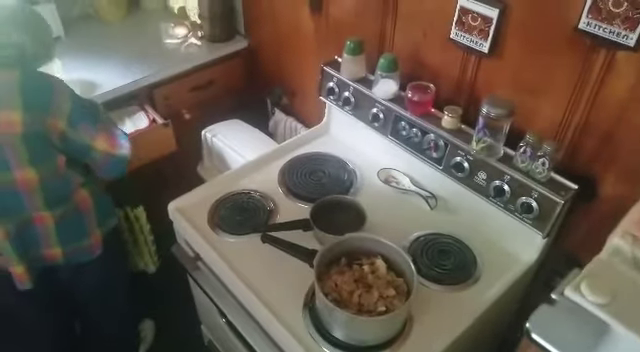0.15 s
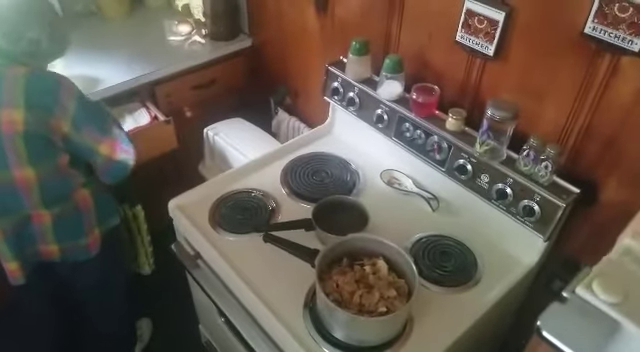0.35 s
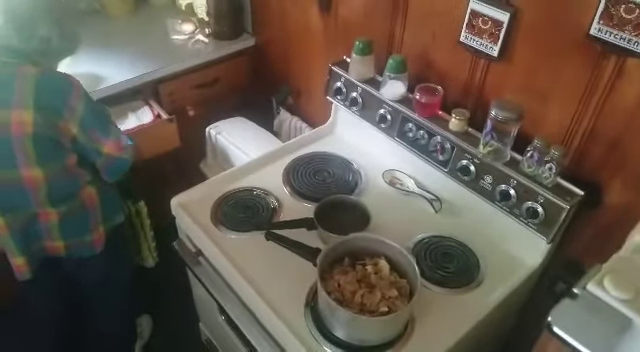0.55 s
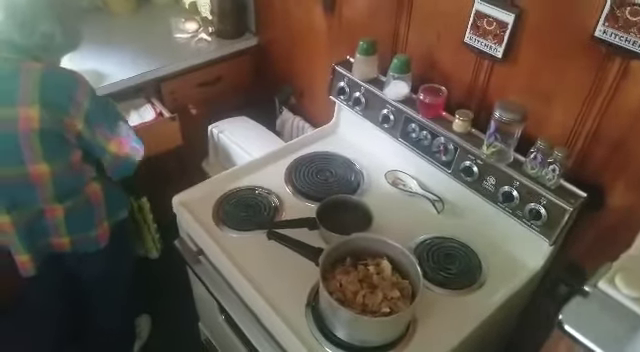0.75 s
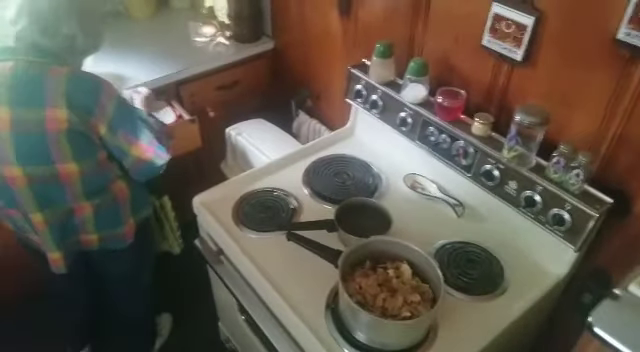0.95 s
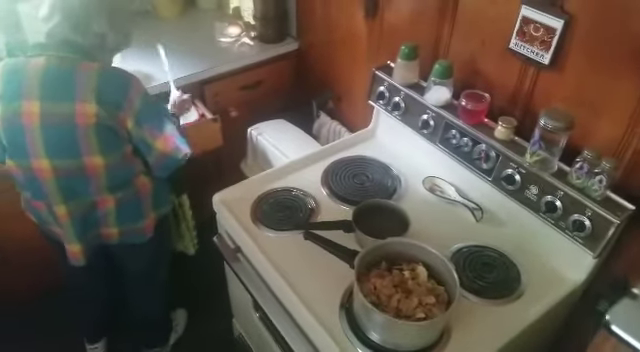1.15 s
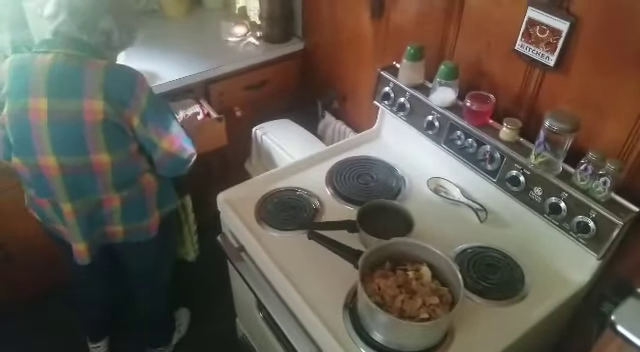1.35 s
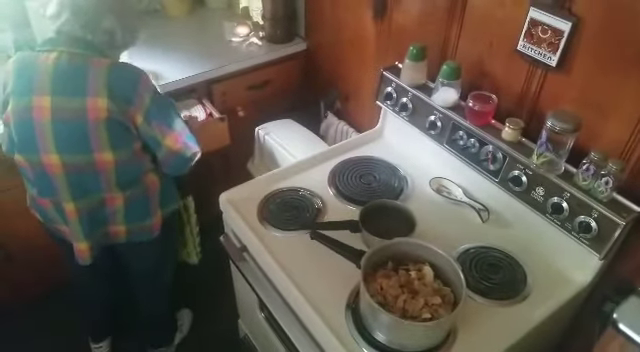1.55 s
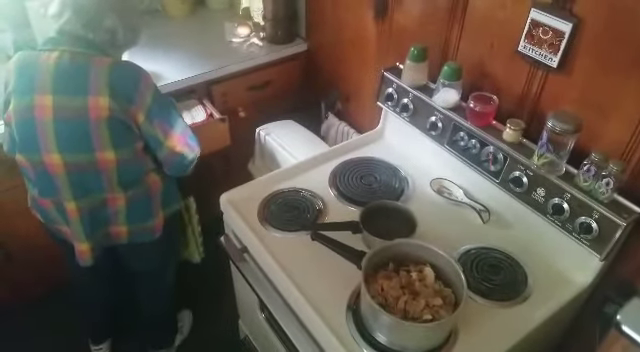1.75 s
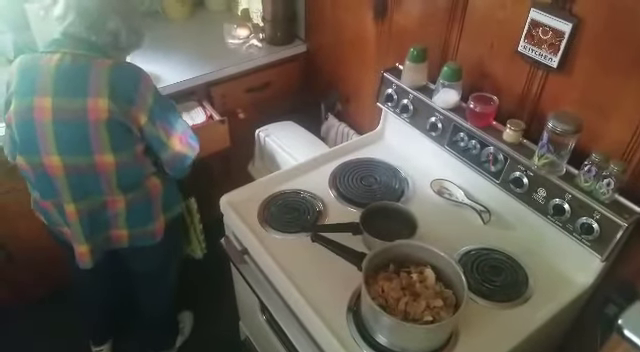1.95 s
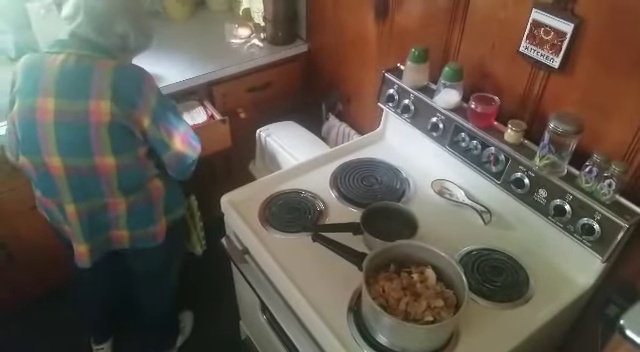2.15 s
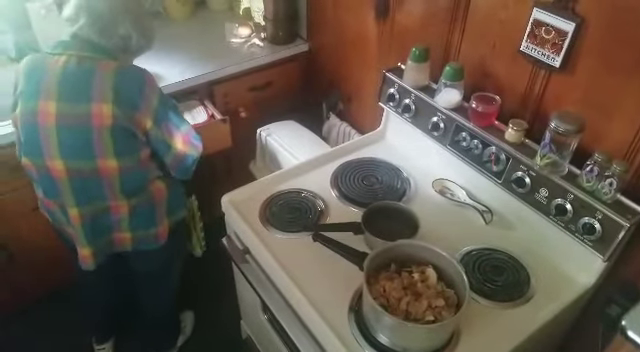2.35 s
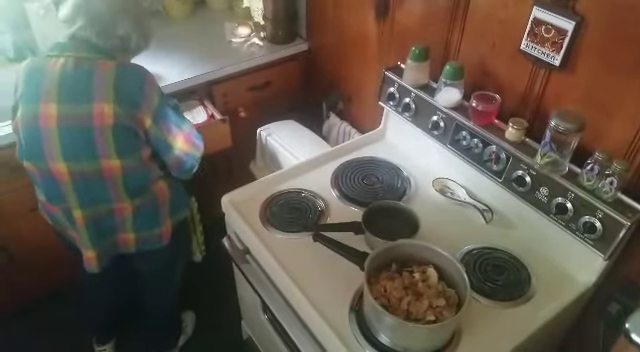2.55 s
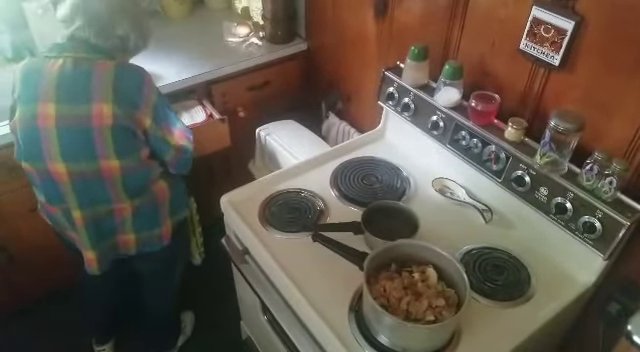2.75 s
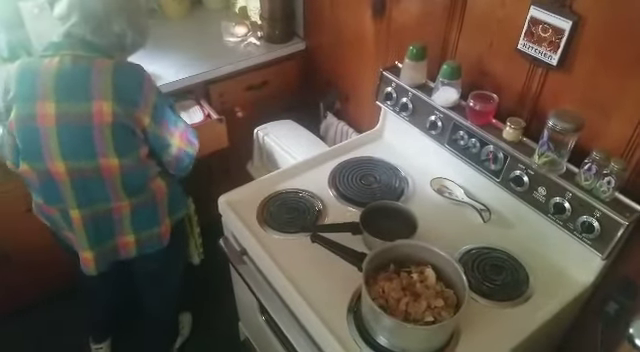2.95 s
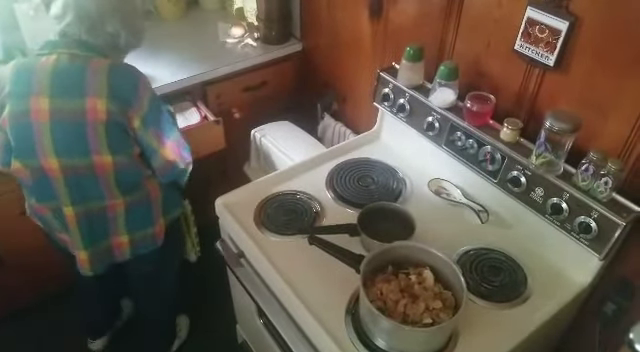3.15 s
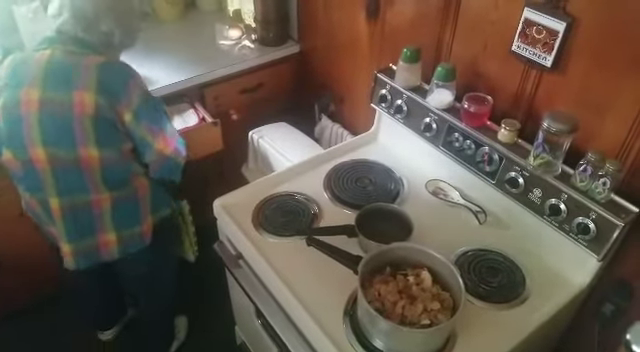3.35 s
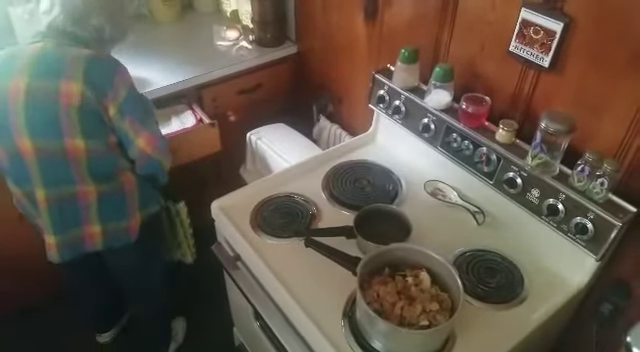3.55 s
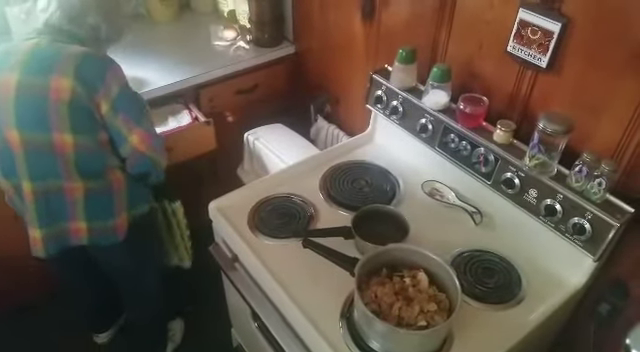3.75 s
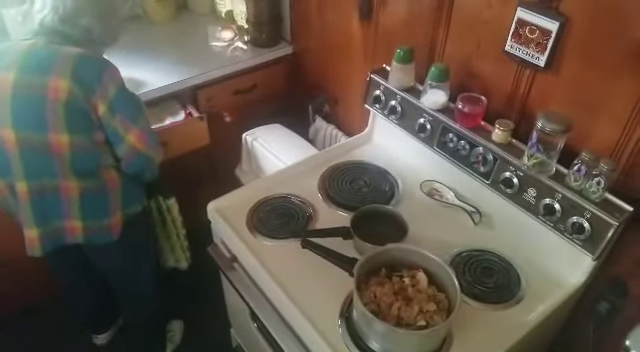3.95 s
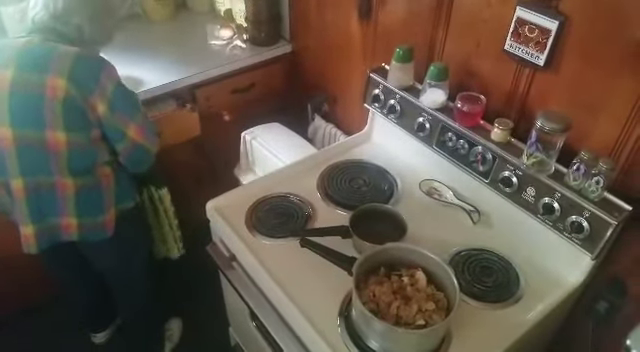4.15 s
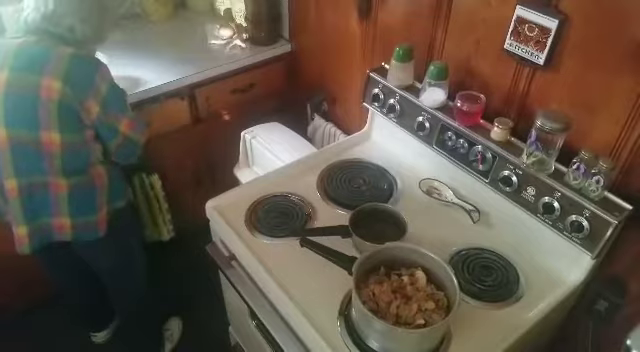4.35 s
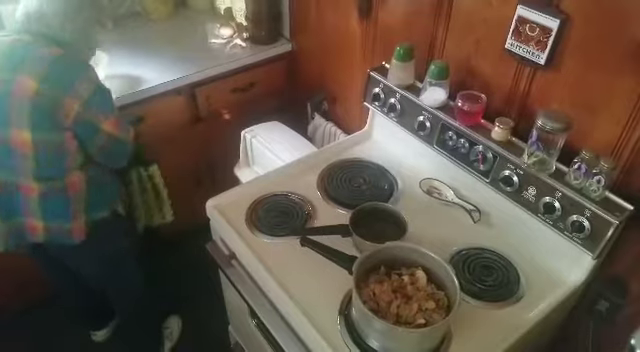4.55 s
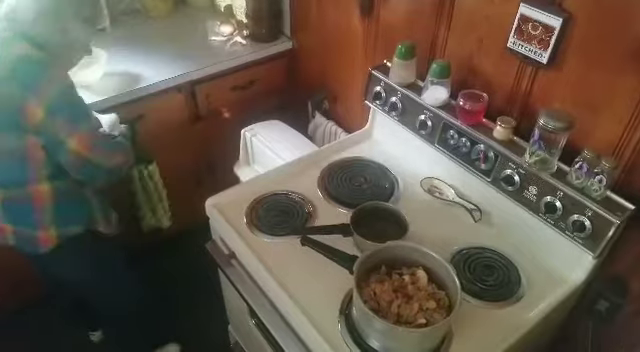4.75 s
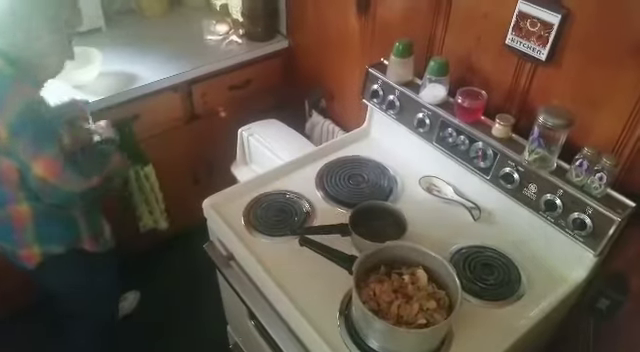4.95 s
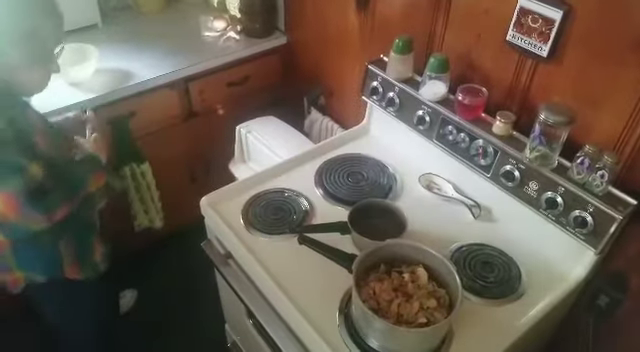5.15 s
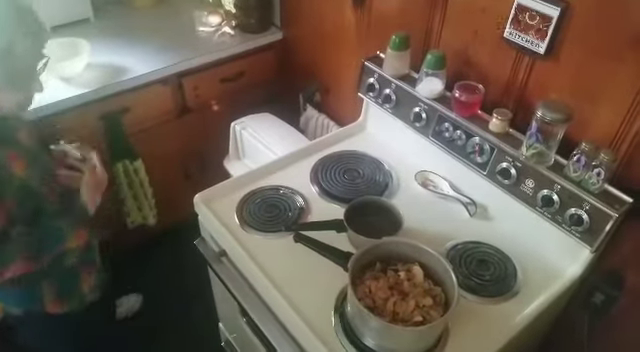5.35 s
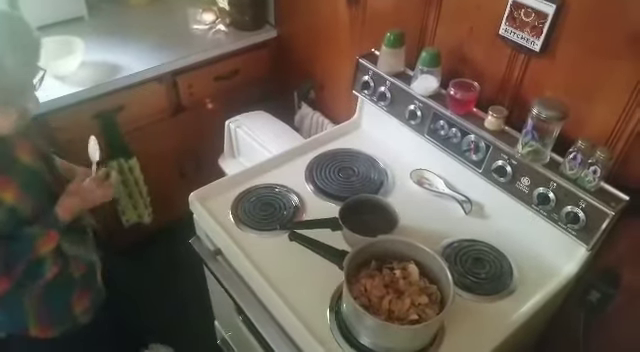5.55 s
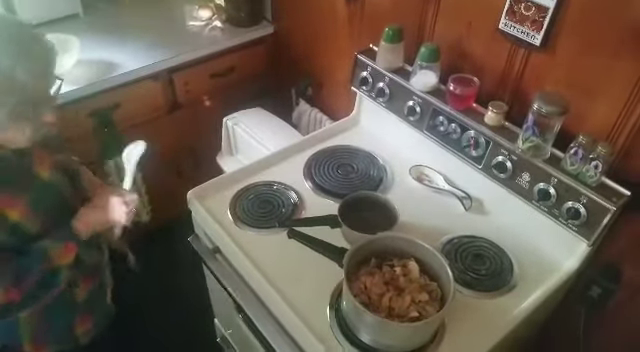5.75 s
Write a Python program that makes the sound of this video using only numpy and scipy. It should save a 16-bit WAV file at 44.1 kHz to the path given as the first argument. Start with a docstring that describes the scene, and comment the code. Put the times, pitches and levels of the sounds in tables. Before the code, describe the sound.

Someone rummages through a drawer of cutlery with uneven clinks and knocks, then pushes it closed with a hard woody thump.

```python
"""Utensils knock, scrape and ring in a wooden kitchen drawer, which is then pushed shut against its stop.
Knocks: noisy contact forces on random short modes, split into bands by hardness. Rings: decaying sines.
Stirring and sliding: streams of stick-slip clicks, filtered. Slam: a filtered crack plus cabinet modes.
All of it passes through a small, hard room; the right port hears it later and duller, over self-noise."""
import sys
import numpy as np
from scipy import signal
from scipy.fft import rfft, irfft
from scipy.io import wavfile
from scipy.ndimage import uniform_filter1d

SR = 44100
rng = np.random.default_rng(int(sys.argv[2]) if len(sys.argv) > 2 else 0)


def generate_wav(sig):
    """Save sig (samples, or channels by samples) to the path in sys.argv[1] as 16-bit PCM at SR."""
    pcm = np.round(np.clip(np.atleast_2d(sig).T, -1, 1) * 32767).astype(np.int16)
    wavfile.write(sys.argv[1], SR, pcm)


N = 256079
TAIL = SR // 2  # length of a blow or a reverberation [samples]
LEAD_S = .02  # lead-in before the first touch


# utensils hitting each other and the drawer; hardness far below 0 is a dull bump, above 0 a bright clash:
# (time [s], strength [dB], hardness [dB], chatter time [s])
KNOCKS = [(0.009, -38.5, -3, 0.0015), (0.030, -38.5, 4, 0.0046), (0.13, -45, -27, 0.002),
          (0.17, -41.5, -26, 0.00071), (0.189, -39, 0.5, 0.013), (0.253, -43.5, -8, 0.0044),
          (0.352, -50.5, 13, 0.0081), (0.523, -38.5, 4.5, 0.0052), (0.772, -44, 4.5, 0.0078),
          (0.818, -41.5, 2.5, 0.0085), (0.862, -39, 3, 0.0038), (0.922, -44, 3.5, 0.013),
          (1.015, -42.5, -5.5, 0.0017), (1.033, -46, 5, .004), (1.184, -57, -18.5, 0.00065),
          (1.271, -62.5, 4.5, 0.0026), (1.337, -45, -8, 0.0013), (1.639, -46, -4.5, 0.0081),
          (1.716, -36.5, -25, 0.0014), (1.731, -30, 4, 0.0077), (1.998, -57.5, -29.5, 0.0014),
          (2.095, -52.5, -33, 0.0047), (2.124, -45.5, -12.5, 0.006), (2.415, -45.5, -31, 0.003),
          (2.487, -40.5, -24.5, 0.00073), (2.578, -37.5, -13.5, 0.0029), (2.656, -47, -3, 0.0043),
          (2.774, -53.5, -1, 0.015), (2.925, -43.5, -17.5, 0.0021), (2.973, -33, 0, 0.0045),
          (3.17, -48.5, 5.5, 0.0043), (3.269, -57.5, -47, .001), (3.346, -41.5, -2, 0.0056),
          (3.69, -55.5, -3, 0.0088), (4.498, -38.5, -5, .008), (4.68, -63, -1, 0.016),
          (5.32, -88.5, 19.5, .002)]
# drawer bottom thud, side wood, clack and tick of the pieces: (low edge [Hz], high edge [Hz])
KNOCK_BANDS = [(70, 250), (250, 900), (900, 3600), (4200, 19000)]
# a harder contact is shorter and moves energy up the same four bands:
# (offset [dB], gain per hardness [dB/dB])
HARDNESS_LAW = [(-5, -0.1), (2, -0.16), (3, 0.38), (1.5, 1.524)]
# colour of the utensils in the drawer: (frequency [Hz], gain [dB])
CLATTER_COLOUR = [(29, -40.5), (50, -4), (81, -5), (337, -9), (398, -4.5), (439, -5), (601, -5.5),
                  (884, -13.5), (1660, -9.5), (3760, -11.5), (6390, -6.5), (6870, -5), (8540, -12.5),
                  (11700, -5), (16000, -11.5)]


def knocks():
    """Each knock shakes the drawer bottom, its sides and the pieces, in shares set by its hardness."""
    out = np.zeros((2, N))
    bands = [signal.butter(3, edges_hz, "band", fs=SR, output="sos") for edges_hz in KNOCK_BANDS]
    for time_s, strength_db, hardness_db, chatter_s in KNOCKS:
        struck = signal.fftconvolve(contact(chatter_s), piece())[:TAIL]
        blow = kitchen(colour(struck, CLATTER_COLOUR))
        for band, (offset_db, lean) in zip(bands, HARDNESS_LAW):
            band_db = strength_db + offset_db + lean * hardness_db
            add(out, time_s - LEAD_S, at_level(signal.sosfilt(band, blow), band_db))
    return out


def contact(chatter_s):
    """Contact force: a faint noisy lead-in, the first touch, then bounces and slips; long is a scrape."""
    t = np.arange(TAIL) / SR - LEAD_S
    chatter_s = max(chatter_s, .001)
    after = np.maximum(t, 0)
    lead_in = .1 * np.exp(-abs(t) / .007)
    swell = (1 - np.exp(-3 * after / chatter_s)) * np.exp(-.8 * after / chatter_s)
    hits = rng.standard_normal(TAIL) * (rng.random(TAIL) < 1400 / SR)  # 1400 per second
    force = .6 * (lead_in + swell) * hits
    force[round(LEAD_S * SR)] = np.exp(-chatter_s / .006)  # first touch
    return force


# modes of the drawer box, shaken by every piece: (frequency [Hz], level [dB], t60 [s])
DRAWER_MODES = [(381, -4.5, 0.048), (414, 2, 0.13), (498, -6.5, 0.26), (613, -0.5, 0.12), (814, -8, 0.055),
                (798, 0, 0.22)]


def piece(count=170, drawer_db=-18):
    """Response of a random utensil: a dry click, its own short modes and the drawer box beneath."""
    t = np.arange(TAIL // 5) / SR
    place, damping, size = rng.random((3, count, 1))
    hz = 900 + 14500 * place ** 1.5
    t60_s = .012 + .06 * damping
    partials = size * np.sqrt(place / t60_s) * amp(-60 * t / t60_s) * np.sin(2 * np.pi * hz * t)
    modes = np.sum(partials, 0)
    box = ring(DRAWER_MODES, vary_db=4)[:len(t)]
    body = .7 * modes / np.linalg.norm(modes) + amp(drawer_db) * box / np.linalg.norm(box)
    body[0] += 1  # click
    return body


# ringing pieces; _MODES: (frequency [Hz], level [dB], t60 [s]), _BLOWS: (time [s], level [dB])
STEEL_MODES = [(4120, -15, .16), (5520, -9, .18), (6990, -4.5, 0.35), (9000, -8.5, .15), (11700, -0.5, .17),
               (11922, 0.5, 0.22), (14620, -7, .14)]
STEEL_BLOWS = [(.524, -36), (1.733, -24), (2.975, -62)]
SPOON_MODES = [(1626, -9, .24), (2530, 0, .26), (3031, -4, .2), (5087, -11, .22), (6815, -12, .17),
               (8812, -11, .16)]
SPOON_BLOWS = [(0.061, -34.5), (0.357, -42), (.784, -38), (0.897, -36.5), (1.025, -40.5), (2.77, -48.5),
               (2.976, -42.5)]
# a hollow cup
CUP_MODES = [(849, -19, 0.48), (1149, -3.5, 0.42), (1360, 7.5, 0.051), (1590, 8.5, 0.036),
             (1820, 9.5, 0.078), (2065, 3.5, 0.047), (2090, -21.5, 0.3)]
CUP_BLOWS = [(0.065, -34), (.872, -38), (2.579, -27)]
LADLE_MODES = [(850, -4.5, 0.16), (1307, -1.5, 0.093), (2210, -10.5, 0.1), (2850, -1.5, 0.065),
               (4480, -6, 0.12), (5880, -3, 0.048), (7140, -4.5, 0.095)]
LADLE_BLOWS = [(3.348, -37)]
HANDLE_MODES = [(2070, -0.88, 0.16), (2320, -1.1, 0.052)]
HANDLE_BLOWS = [(3.692, -52.5)]
TIP_MODES = [(4260, -9, 0.085), (5670, -11, .07), (7300, -9, .1), (9660, 7, 0.065), (11050, 13, 0.056),
             (12400, -6, .07)]
TIP_BLOWS = [(5.317, -51)]


def utensils(count=4, split_hz=22):
    """The harder pieces ring on after a blow; held loosely, their modes split and beat."""
    out = np.zeros((2, N))
    pieces = [(STEEL_MODES, STEEL_BLOWS), (SPOON_MODES, SPOON_BLOWS), (CUP_MODES, CUP_BLOWS),
              (LADLE_MODES, LADLE_BLOWS), (HANDLE_MODES, HANDLE_BLOWS), (TIP_MODES, TIP_BLOWS)]
    for modes, blows in pieces:
        for time_s, blow_db in blows:
            ringing = 0
            for _ in range(count):
                split = [(hz + split_hz * rng.standard_normal(), db, t60_s) for hz, db, t60_s in modes]
                ringing = ringing + ring(split)
            add(out, time_s, at_level(ringing_in_room(ringing, wet_db=3), blow_db))
    return out


def ring(modes, vary_db=2):
    """Free vibration: decaying sines; the place of the blow shifts the balance of the modes."""
    t = np.arange(TAIL) / SR
    out = np.zeros(TAIL)
    for hz, db, t60_s in modes:
        start_db = db + vary_db * rng.standard_normal()
        out += amp(start_db - 60 * t / t60_s) * np.sin(2 * np.pi * hz * t)
    return out


# the hand drags pieces over each other; hardness is the scratch against the rub:
# (start [s], length [s], strength [dB], hardness [dB])
STROKES = [(0.039, 0.27, -42.5, -11), (0.294, 0.24, -41.5, 10.5), (0.488, 0.23, -40.5, -3.5),
           (1.289, 0.14, -54.5, 6), (1.886, 0.067, -51.5, -34), (2.011, 0.19, -56, 12),
           (2.072, 0.41, -64.5, -11), (2.433, 0.19, -46, -3), (3, 0.28, -54.5, 0)]
# settling of the neighbours: peak against the knock, delay of that peak, scratch besides the hardness
SETTLE_DB, SETTLE_PEAK_S, SETTLE_SCRATCH_DB = -28, 0.09, -6


def stirring(count=6):
    """Strokes swell and fade and knocked pieces settle: a dull rub on wood, a scratch between pieces."""
    t = np.arange(N) / SR
    low = signal.butter(2, [80, 2800], "band", fs=SR, output="sos")
    high = signal.butter(2, 3200, "high", fs=SR, output="sos")
    wood = colour(friction(per_s=500, spread_db=1.5), CLATTER_COLOUR)
    rub = evened(signal.sosfilt(low, wood))
    slips = sum(signal.oaconvolve(friction(per_s=66, spread_db=4.5), piece())[:N] for _ in range(count))
    scratch = evened(signal.sosfilt(high, colour(slips, CLATTER_COLOUR)))
    out = np.zeros(N)
    for start_s, length_s, db, hardness_db in STROKES:
        swell = np.sin(np.pi * np.clip((t - start_s) / length_s, 0, 1)) ** 2
        out += swell * amp(db) * (rub + amp(hardness_db) * scratch)
    for time_s, db, hardness_db, _ in KNOCKS:
        age = np.maximum(t - time_s, 0) / SETTLE_PEAK_S
        settle = age * np.exp(1 - age) * amp(db + SETTLE_DB)
        out += settle * (rub + amp(hardness_db + SETTLE_SCRATCH_DB) * scratch)
    return kitchen(out)


def friction(per_s, spread_db):
    """Stick and slip: a steady stream of clicks, a few of them large."""
    size = amp(spread_db * np.minimum(rng.exponential(1, N), 4))
    return evened(size * rng.choice([-1, 1], N) * (rng.random(N) < per_s / SR))


# course of the drawer on its runners, before the offsets of rub and rumble: (time [s], level [dB])
SLIDE_COURSE = [(3.761, -85), (3.9, -62), (4.1, -49), (4.3, -46), (4.42, -41), (4.492, -43)]
# colour of the rubbing wood: (frequency [Hz], gain [dB])
RUNNER_COLOUR = [(25, -20), (75, -0.5), (200, -3), (300, -8.5), (700, -13.5), (900, -13), (1500, -12),
                 (2800, -17), (5000, -21), (7500, -24), (9000, -30.5), (15000, -21.5)]
# resonances of the runners: (frequency [Hz], width [Hz], gain [dB])
RUNNER_MODES = [(375, 90, -1), (700, 60, 0), (1110, 120, -5), (1652, 120, -6), (2487, 400, -7.5)]


def slide():
    """Wood rubs on wood with uneven grip; the runners resonate and the box rumbles more with speed."""
    times_s, db = np.transpose(SLIDE_COURSE)
    rub = colour(friction(per_s=520, spread_db=2.5), RUNNER_COLOUR)
    resonances = sum(amp(gain_db) * signal.lfilter(*signal.iirpeak(hz, hz / width_hz, SR), rub)
                     for hz, width_hz, gain_db in RUNNER_MODES)
    low = signal.butter(2, [60, 1000], "band", fs=SR, output="sos")
    rumble = signal.sosfilt(low, colour(friction(per_s=170, spread_db=1), RUNNER_COLOUR))
    grip_db = 1.8 * evened(uniform_filter1d(rng.standard_normal(N), 300))
    # rub grows slowly with speed, rumble quickly
    speed_db = db - db.max()
    rub_db = db - 6 - 0.64 * speed_db
    rumble_db = db + 3 + 1.3 * speed_db
    sound = evened(rub + resonances) * level(times_s, rub_db) + evened(rumble) * level(times_s, rumble_db)
    return kitchen(sound * amp(grip_db))


# the drawer jolts in its frame, twice during the search, then as it meets its stop and rebounds:
# (time [s], crack [dB], cabinet boom [dB], chatter time [s])
SLAM_JOLTS = [(0.526, -46, -32, 0.00088), (3.349, -68, -43.5, 0.032), (4.495, -19.5, -37.5, 0.0026),
              (4.511, -34, -20, 0.004), (4.529, -43.5, -21, 0.005), (4.564, -55, -43, .016),
              (4.679, -75, -61, 0.016)]
# colour of the front on the frame: (frequency [Hz], gain [dB])
CRACK_COLOUR = [(60, -18.5), (200, 0.5), (420, 2), (560, 4.5), (780, 5), (1000, -2), (1400, -1.5),
                (2600, -8), (4000, -14.5), (6500, -26), (8500, -43), (11000, -23.5), (16000, -41)]
# cabinet panels: (frequency [Hz], level [dB], t60 [s])
CABINET_MODES = [(66, -27, 0.25), (86, -14, 0.53), (112, -9, 0.16), (141, 2, 0.12), (157, 2.5, 0.11),
                 (195, -6.5, .14), (241, -15.5, 0.34), (335, -6, 0.2), (428.8, -3, 0.18)]


def slam(lowest_hz=62):
    """The front cracks on the frame and the cabinet booms; a longer contact excites high modes less."""
    out = np.zeros((2, N))
    for time_s, crack_db, boom_db, chatter_s in SLAM_JOLTS:
        modes = [(hz, db - 20 * np.log10(1 + (hz * chatter_s) ** 2), t60_s)
                 for hz, db, t60_s in CABINET_MODES]
        crack = kitchen(colour(contact(chatter_s), CRACK_COLOUR))
        boom = ringing_in_room(ring(modes, vary_db=2.5), wet_db=-8.5)
        add(out, time_s - LEAD_S, at_level(crack, crack_db))
        add(out, time_s, at_level(boom, boom_db))
    # the boom carries little below its lowest mode
    return signal.sosfilt(signal.butter(4, lowest_hz, "high", fs=SR, output="sos"), out)


# reverberation: (frequency [Hz], t60 [s])
ROOM_T60 = [(80, 0.43), (260, 0.34), (700, 0.28), (1800, 0.28), (5000, 0.26), (13000, 0.22)]


def kitchen(x, direct_db=-10.5):
    """Room path: weak direct sound, reflections that build up, then a tail that dies by band."""
    hz, t, z = signal.stft(port_noise(TAIL), SR, nperseg=256)
    decay = amp(-60 * t / read(ROOM_T60, hz)[:, None])
    tail = signal.istft(z * decay, SR, nperseg=256)[1]
    age_s = np.arange(tail.shape[1]) / SR
    tail *= (1 - np.exp(-age_s / 0.0023)) * (1 + .5 * np.exp(-age_s / .009))
    tail /= np.linalg.norm(tail[0])
    tail[:, 0] += amp(direct_db)  # against the tail's energy
    return signal.oaconvolve(x[None], tail, axes=1)[:, :len(x)]


def ringing_in_room(x, wet_db):
    """A sustained ring, heard directly and by way of the room."""
    return x + amp(wet_db) * kitchen(x)


# how alike the noise is at the two ports: (frequency [Hz], coherence [0-1])
PORT_COHERENCE = [(60, 0.69), (200, 0.97), (500, 0.8), (1000, 0.12), (3000, 0.13), (14000, .2)]


def port_noise(n):
    """Noise at two ports, more alike in the bass than in the treble."""
    left, other = rfft(rng.standard_normal((2, n)))
    same = np.clip(read(PORT_COHERENCE, np.fft.rfftfreq(n, 1 / SR)), 0, 1)
    return irfft(np.array([left, same * left + np.sqrt(1 - same ** 2) * other]), n)


# colour of the recorder's self-noise: (frequency [Hz], gain [dB])
SELF_NOISE_COLOUR = [(15, -37.5), (25, -9.5), (92, 1), (127, -6.5), (175, -16.5), (624, -28.5), (734, -31),
                     (962, -29), (1400, -28.5), (1520, -27), (1740, -31), (4370, -32), (8590, -37),
                     (13600, -24.5), (16000, -37)]


def self_noise(level_db=-63, right_db=-3):
    """Low rumble and faint hiss of the recorder: coloured noise, softer on the right."""
    return amp(level_db) * evened(colour(port_noise(N), SELF_NOISE_COLOUR)) * amp([[0], [right_db]])


def amp(db):
    """Decibels to gain."""
    return 10 ** (np.asarray(db) / 20)


def read(points, hz):
    """Reads a (frequency [Hz], value) table on a log-frequency axis."""
    f, value = np.transpose(points)
    return np.interp(np.log(hz + 1), np.log(f + 1), value)


def evened(x):
    """Scales to rms 1."""
    return x / np.sqrt(np.mean(x ** 2) + 1e-20)


def at_level(x, db):
    """Gives a blow the energy that 40 ms at this level would have, at the left port."""
    return x * amp(db) * np.sqrt(.04 * SR / (np.sum(x[0] ** 2) + 1e-20))


def add(mix, time_s, sound):
    """Mixes a stereo sound in at a time, cut to fit."""
    start = round(time_s * SR)
    sound = sound[:, max(-start, 0):]
    part = mix[:, max(start, 0):][:, :sound.shape[1]]
    part += sound[:, :part.shape[1]]


def colour(x, points, size=4096):
    """Causal minimum-phase filter of a (frequency [Hz], gain [dB]) shape."""
    log_gain = np.log(amp(read(points, abs(np.fft.fftfreq(size, 1 / SR)))))
    taps = np.fft.ifft(np.exp(np.conj(signal.hilbert(log_gain)))).real[:size // 2]
    taps = taps.reshape((1,) * (x.ndim - 1) + (-1,))
    return signal.oaconvolve(x, taps, axes=-1)[..., :x.shape[-1]]


def level(times_s, db, fade_s=0.018):
    """Gain along a level curve, faded to -120 dB outside it."""
    knots_s = np.r_[times_s[0] - fade_s, times_s, times_s[-1] + fade_s]
    return amp(np.interp(np.arange(N) / SR, knots_s, np.r_[-120, db, -120]))


# shading of the right port: (frequency [Hz], gain [dB])
SHADE_COLOUR = [(60, -6.5), (110, -2), (200, -7), (380, -10.5), (1200, -12), (2400, -15.5), (4400, -28.5),
                (8000, -21.5), (15000, -21.5)]


def scene(right_lag_s=.00033):
    """The drawer, first and clear on the left, later and dull on the right, over the noise floor."""
    left, right = knocks() + utensils() + stirring() + slide() + slam()
    lag = np.exp(-2j * np.pi * np.fft.rfftfreq(N, 1 / SR) * right_lag_s)
    right = irfft(rfft(right) * lag, N)
    return np.array([left, colour(right, SHADE_COLOUR)]) + self_noise()


def record(dry, edge_hz=16000):
    """Band limit: a linear-phase low-pass."""
    taps = signal.firwin(511, edge_hz, window=("kaiser", 9), fs=SR)
    return signal.oaconvolve(dry, taps[None], "same")


dry = scene()
out = record(dry)
generate_wav(out)
```